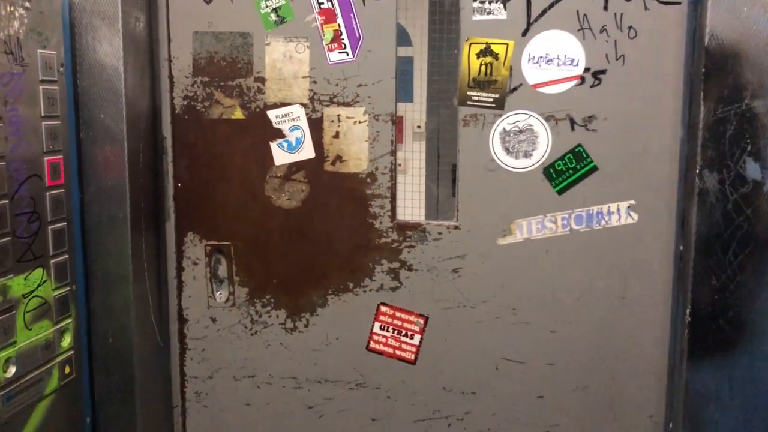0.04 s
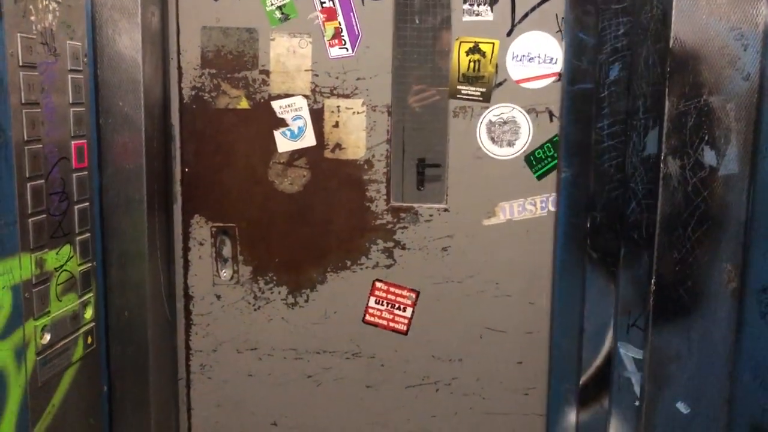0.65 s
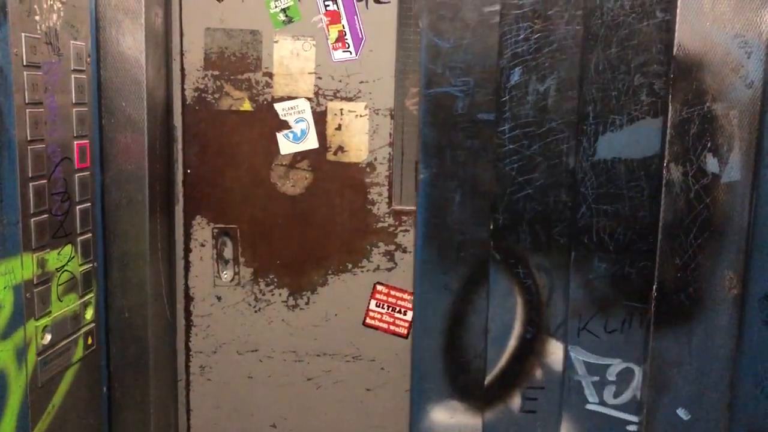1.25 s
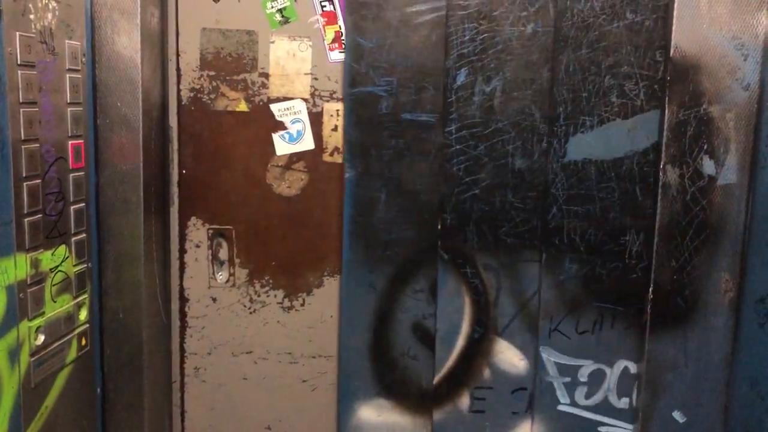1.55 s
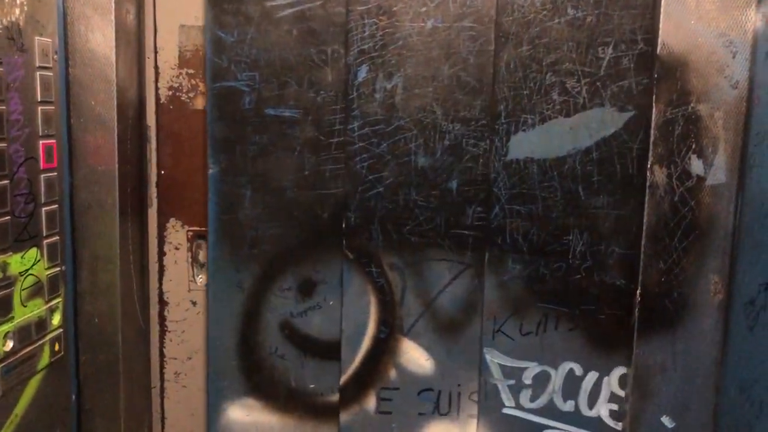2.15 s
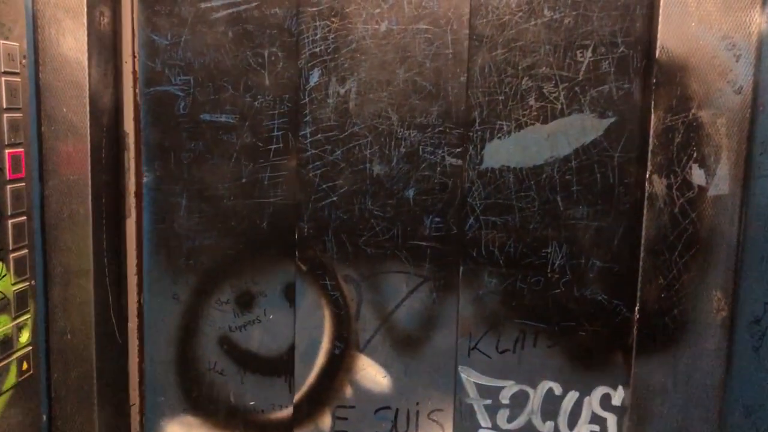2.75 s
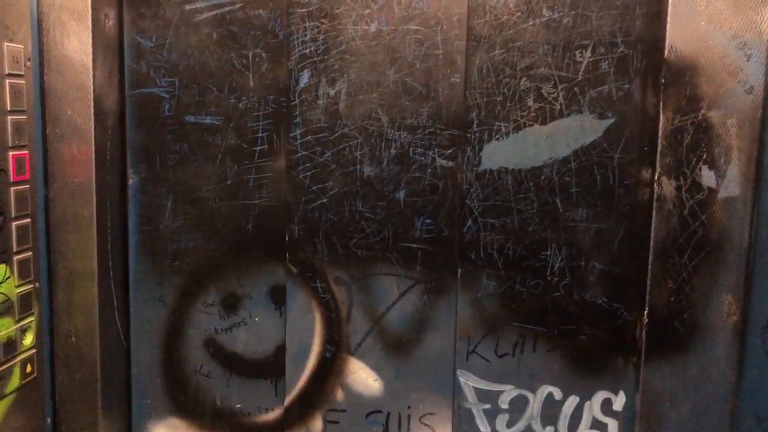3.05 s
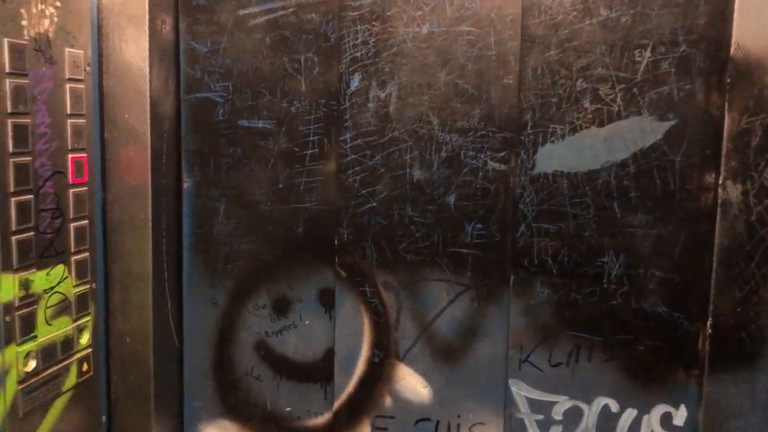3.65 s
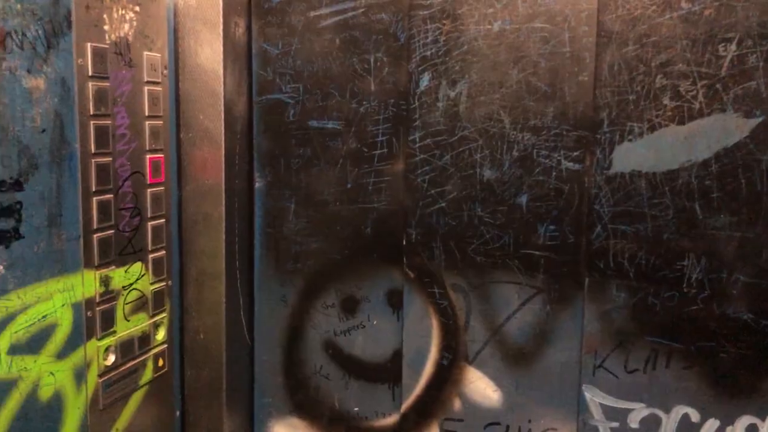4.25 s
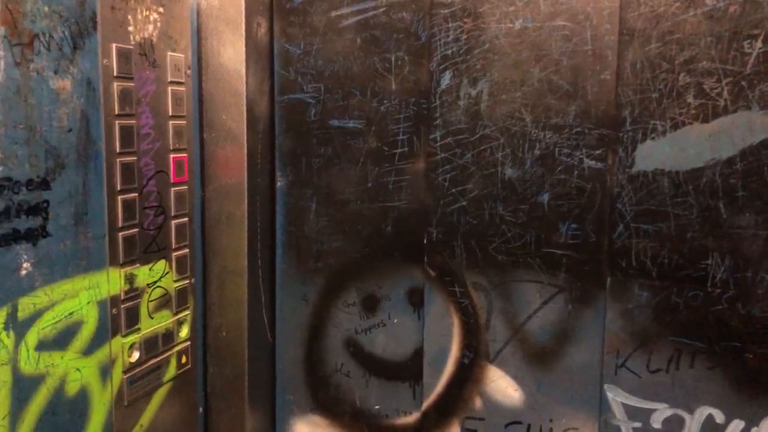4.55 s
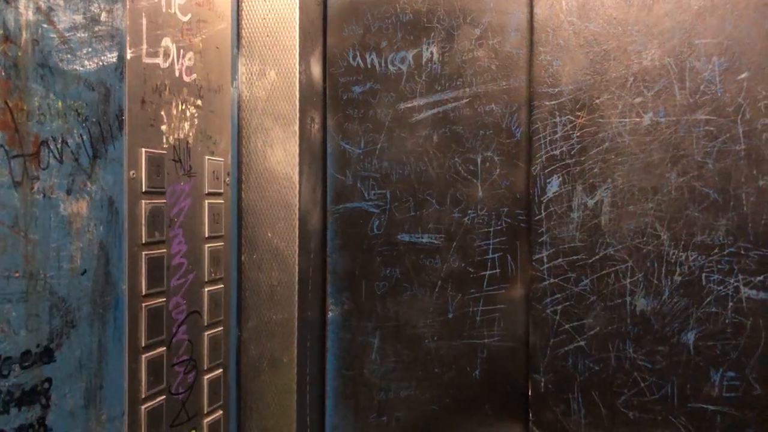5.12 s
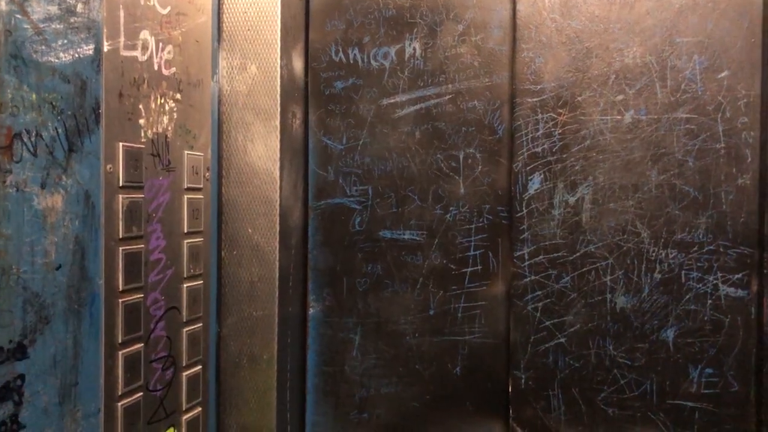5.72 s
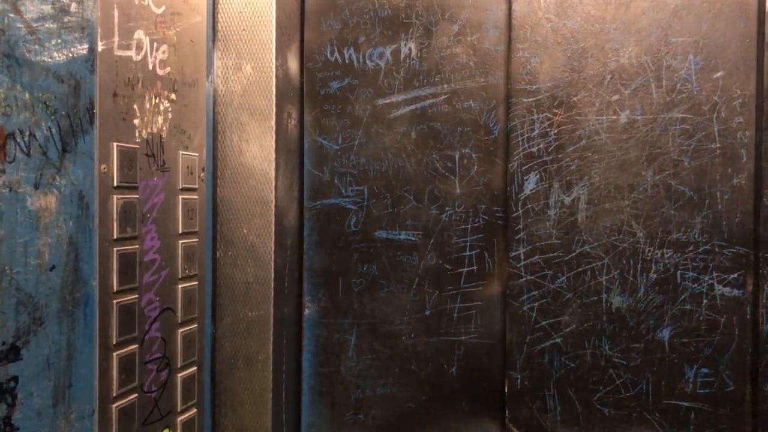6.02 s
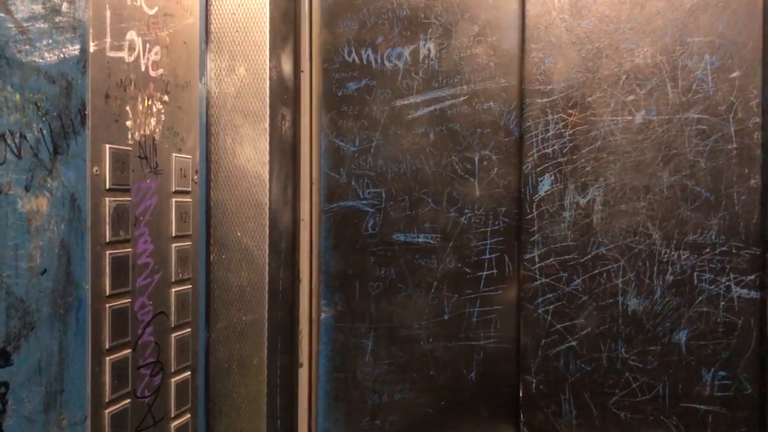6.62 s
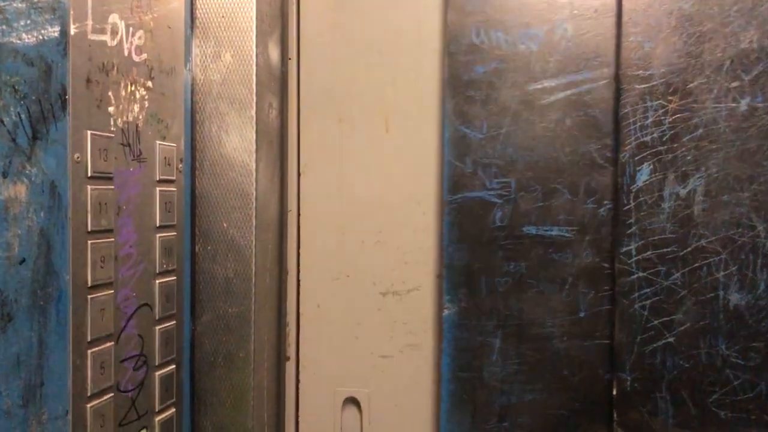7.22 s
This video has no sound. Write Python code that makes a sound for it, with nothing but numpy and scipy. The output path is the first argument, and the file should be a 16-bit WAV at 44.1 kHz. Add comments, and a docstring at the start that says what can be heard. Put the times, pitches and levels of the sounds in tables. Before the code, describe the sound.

An old lift door bangs, the folding door rattles shut, the car rumbles briefly, then the lock clunks and the door reopens.

```python
"""Inside an old steel lift. The landing door bangs and its panels ring. The folding car door rolls shut,
scraping, rattling and squealing, then latches and bumps home. The car moves off with a fading rumble
and a faint motor whine, and the level dips for an instant. After a quiet hum the lock releases with
a double clunk, and the door rolls open again."""
import sys
import numpy as np
from scipy import signal
from scipy.fft import rfft, irfft, next_fast_len
from scipy.io import wavfile
from scipy.ndimage import uniform_filter1d

SR = 44100
rng = np.random.default_rng(int(sys.argv[2]) if len(sys.argv) > 2 else 0)


def to_wav(sig):
    """Store sig (one row per channel, or 1-D mono) as 16-bit WAV at the path in sys.argv[1].

    Samples outside -1..1 are clipped; the rate is SR.
    """
    pcm = np.clip(np.atleast_2d(sig), -1, 1) * 32767
    pcm = np.round(pcm).astype(np.int16)
    wavfile.write(sys.argv[1], SR, pcm.T)  # frames by channels


N = 329594
TIME = np.arange(N) / SR

# A "mode" is a pitch at which a part likes to ring. Its ring time (t60) is how long it takes to fall 60 dB.
# A "spectrum" says how strong a noise is from low to high pitch.

# spectrum of the air in the shaft: (pitch [Hz], level [dB])
SHAFT_AIR = [(30, -10), (200, -11), (430, -9), (600, -16), (1000, -19.5), (1800, -25), (4000, -28),
             (7000, -25), (10000, -28), (15000, -28.5)]
# motor tones: (start [s], end [s], pitch [Hz], level [dB], width [Hz])
MOTOR_TONES = [(3.85, 4.62, 1001, -81.5, 11), (3.83, 4.52, 1916, -87.5, 6), (3.87, 4.5, 1997, -90, 5),
               (3.87, 4.5, 2078, -91, 5), (4.08, 4.45, 167, -62, 1.5), (4.45, 4.86, 167, -71, 2),
               (3.8, 4.86, 402, -78, 6), (3.8, 3.95, 575, -73, 6), (4.42, 4.54, 575, -74, 6),
               (4.3, 4.92, 1320, -80.5, 90), (4.5, 5.85, 1001, -91, 8), (4.88, 5.85, 200, -79, 3),
               (4.95, 5.7, 301, -85, 3)]

# modes of the car swaying on its ropes, of its floor and its walls: (pitch [Hz], width [Hz], level [dB])
SWAY_MODES = [(32.85, 5.6, 5), (56.8, 6, -1.5)]
FLOOR_MODES = [(80, 14, 2.5), (92.8, 15.1, 0), (116.2, 15, -5.5)]
WALL_MODES = [(175.4, 28, -1), (204.3, 11, 0.5), (218.6, 6.6, 6), (243.1, 3.7, 4), (256.2, 17, -2.5),
              (328.7, 11, -3), (362, 17, -12.5)]
# how hard each of the three shakes: (level at full door speed [dB], change with door speed [dB per dB],
# boost with the door unfolded [dB], level in a steady ride [dB], level at rest [dB])
SWAY_DRIVE = (-46, 0.84, 6.5, -69, -82)
FLOOR_DRIVE = (-40, 1.05, 2, -65, -72.5)
WALL_DRIVE = (-47.5, 0.8, 10, -66, -82.5)
# jolts that shake the car: (time [s], sway [dB], floor [dB], walls [dB])
JOLTS = [(0.1, -54, -34.5, -37), (0.72, -37.5, -36.5, -50.5), (0.82, -54, -35.5, -46.5),
         (1.02, -41, -33, -44.5), (1.41, -39.5, -48, -42.5), (1.56, -36.5, -36, -65),
         (1.93, -55, -58, -42.5), (2.12, -39.5, -62, -38.5), (2.38, -43, -42, -65), (2.55, -44, -46, -71),
         (3.12, -57, -48, -46), (3.29, -48, -53, -46), (4.64, -69, -58, -74), (5.702, -82.5, -59.5, -59.5),
         (5.94, -53, -46, -42), (6.08, -43, -39.5, -38), (6.42, -64, -49.5, -43.5), (6.82, -63, -49, -46.5),
         (6.92, -40, -60, -40.5), (7.32, -50, -63, -39)]

# speed of the car door, given as a loudness: (time [s], level [dB])
CLOSING_SPEED = [(0.45, -54), (0.49, -54), (1.15, -47), (1.29, -47.5), (1.93, -46.5), (1.96, -45),
                 (2.72, -63), (3.3, -65.5)]
OPENING_SPEED = [(6.42, -58.5), (6.454, -62), (6.732, -63.5), (7.154, -52.5), (7.45, -47)]
# how far the door is unfolded: (time [s], share [0-1])
UNFOLDED = [(0.2, 0), (2.6, 1), (6.5, 1), (7.47, .75)]
# when the door's folding panels, the "leaves", slide in the floor groove, the "sill": (start [s], length [s])
SILL_CONTACT = [(0.33, 4.2), (6.81, 1)]
# dry rollers and hinges squealing: (start [s], length [s], pitch [Hz], level [dB])
SQUEALS = [(0.904, 0.098, 2100, -58), (1.023, 0.096, 893, -44.5), (1.173, 0.17, 900, -52.5),
           (1.205, 0.33, 686, -51.5), (1.438, 0.078, 1383, -52), (3.142, 0.08, 1030, -61),
           (3.211, 0.081, 1020, -51.5)]
# a leaf scuffs the sill and its hinge clacks: (start [s], length [s], hiss [dB], clack [dB])
SCUFFS = [(0.11, 0.082, -51.5, -61.5), (0.201, 0.1, -46.5, -54), (0.682, 0.06, -55.5, -48),
          (0.794, 0.11, -51, -57), (1.001, 0.084, -54.5, -52.5), (1.095, 0.05, -54.5, -79),
          (1.338, 0.014, -53, -65), (1.57, 0.036, -56, -67), (2.132, 0.011, -53, -48),
          (2.185, 0.025, -53.5, -61), (2.242, 0.016, -60, -72), (2.39, 0.051, -64, -68),
          (3.285, 0.056, -61, -60), (6.98, .035, -66, -66), (7.243, 0.017, -53, -59)]
# spectra of that hiss and that clack: (pitch [Hz], level [dB])
SCUFF_SPECTRUM = [(1500, -13), (4000, -1.5), (7000, -1.5), (9000, -3.5), (12500, 2.5), (16000, -11)]
CLACK_SPECTRUM = [(300, -10), (900, 7), (1800, -4.5), (4000, 0), (7000, -13), (15000, -34)]
# modes of the steel leaves: (pitch [Hz], level [dB])
LEAF_MODES = [(883, 0), (1375, -2), (1412, 0), (1535, -2), (1610, -3), (1685, -2), (1830, -1), (2008, -3),
              (2150, -1), (2444, -7), (2756, -2), (2815, -3), (2923, -4), (3170, -4), (3445, -6),
              (3895, -5), (4120, -8), (4400, -5), (4680, -5), (4975, -9), (5180, -9), (5740, -9),
              (6600, -10)]
# rollers, hinges and panels knocking:
# (time [s], level [dB], pitch [Hz], width [octaves], share of clear ring [0-1], rise [s])
KNOCKS = [(0.520, -45.5, 630, 0.27, 0.08, 0.0016), (0.694, -44.5, 1390, 0.37, 0.46, .008),
          (0.886, -44, 1880, 0.3, 0.2, 0.0038), (0.888, -47.5, 3900, 0.46, 0.3, 0.0024),
          (0.988, -48, 1720, .12, 0.2, 0.0024), (1.035, -44.5, 1300, 1, 0.5, .004),
          (1.349, -46.5, 3680, 0.36, 0.23, 0.0025), (1.566, -56, 1700, 0.91, 0.1, .003),
          (1.702, -43, 1560, 0.43, 0.7, 0.0039), (1.70, -54, 4600, 0.09, 0.2, .002),
          (1.847, -45, 1620, 0.49, 0.3, 0.0044), (1.85, -54, 6050, 0.2, 0.2, .002),
          (1.915, -42.5, 2820, 0.044, 0.4, 0.0018), (1.933, -41, 1690, 0.56, 0.75, 0.002),
          (1.934, -52.5, 4330, .14, 0.45, 0.0012), (1.952, -39, 410, 0.42, 0, .004),
          (2.003, -46.5, 800, 0.48, 0, .003), (2.066, -46, 400, 0.19, 0, 0.0032),
          (2.13, -52, 500, .6, 0.4, 0.005), (2.176, -49, 1200, 0.45, 0.7, .003),
          (2.215, -45, 400, 0.33, 0.1, .004), (2.445, -57, 830, 0.3, 0.3, 0.0056),
          (2.505, -54.5, 1490, 1, 0.3, 0.0034), (2.749, -57, 4500, 0.34, 0.2, .002),
          (2.756, -54.5, 1670, 0.6, 0.35, 0.011), (2.754, -43, 836, 0.24, 0.25, 0.015),
          (3.125, -56, 890, 0.16, 0.2, 0.014), (3.189, -51.5, 4760, 0.83, 0.4, 0.0016),
          (3.194, -48.5, 960, 0.031, 0.01, 0.0046), (3.212, -53.5, 2300, 0.39, 0, .004),
          (3.229, -56, 1860, 0.049, 0.7, .003), (3.256, -60, 1370, 0.13, 0.7, .003),
          (3.27, -49, 550, 0.3, 0.18, .004), (4.43, -72, 605, 0.75, 0.2, .002),
          (4.679, -65, 450, .7, 0.01, .002), (5.921, -41.5, 2440, 0.045, 0.2, .001),
          (6.029, -37, 1585, .06, 0.77, 0.00085), (6.26, -46.5, 645, 0.47, 0, 0.024),
          (6.44, -52.5, 620, 0.33, 0.2, 0.018), (6.75, -66, 800, 0.23, 0.06, .002),
          (7.246, -56.5, 4200, .18, 0.2, .002), (7.362, -43, 2950, 0.16, 0.1, .001),
          (7.344, -48, 1210, 0.66, 0.3, 0.008)]
# modes of the roller track: (pitch [Hz], width [Hz], level [dB])
TRACK_MODES = [(308, 14, 6), (355, 25, 7), (398, 18, 10), (560, 40, -2), (680, 18, 4), (788, 20, 0),
               (915, 28, -1), (1040, 40, -5), (1356, 45, -1), (1540, 45, -6), (1850, 90, -7)]
# spectra of the rolling wheels and the sliding leaves: (pitch [Hz], level [dB])
ROLLING_SPECTRUM = [(100, -15.5), (400, 6), (600, -1.5), (1000, -6), (2000, -15), (4000, -18), (7000, -32),
                    (15000, -41)]
SLIDING_SPECTRUM = [(800, -4.5), (3000, 6), (5500, 1.5), (8000, -4), (11500, 1), (14000, -1.5), (16000, -1)]

# the latch scrapes in its slot: (start [s], level [dB], length [s], rasp [dB], brightness [dB])
LATCH_STROKES = [(-0.01, -40, 0.057, 5.5, -2.5), (3.114, -55, 0.029, -5, -3), (3.147, -58, .034, -16, -8),
                 (5.885, -56, 0.0088, -12, -3), (5.896, -41, .022, -10, 3.5), (5.915, -44, 0.052, 0, 0),
                 (5.986, -49.5, 0.047, 7, -2.5)]
# modes of the latch: (pitch [Hz], width [Hz], level [dB])
LATCH_MODES = [(2130, 120, -17), (2850, 160, -12), (3390, 70, -2), (3560, 80, 1), (3900, 90, -4),
               (4260, 160, -6), (5090, 120, -14), (5980, 160, -6), (6370, 200, -8), (7080, 220, -6),
               (7330, 140, 0), (7640, 220, -6), (8250, 300, -11), (10500, 200, -7)]
# spectrum of its rasp: (pitch [Hz], level [dB])
RASP_SPECTRUM = [(100, -0.5), (600, -1), (1500, -8), (4000, -7), (5500, -11.5), (8000, -8.5),
                 (15000, -15.5)]
# the catch snaps free; a hinge drops on its stop: (time [s], level [dB], brightness [dB per octave])
CATCH_SNAPS = [(5.895, -46, -4), (5.922, -46, 8), (6.034, -42, 5)]
HINGE_CLACKS = [(7.362, -54.5, 4), (7.370, -49, -4), (7.380, -44.5, -5)]
# modes of the steel catch and of the hinge with its leaf: (pitch [Hz], level [dB], ring time [s])
CATCH_MODES = [(3553, 0, .06), (3880, -9, .16), (7295, -1, .15), (7410, -5, .16), (10500, -14, .11)]
HINGE_MODES = [(1362, -2, .26), (1440, -6, .2), (1523, 1, .2), (1700, -1, .26), (1790, -5, .2),
               (1960, -6, .3), (2654, -7, .3), (2790, -6, .22), (2934, -1, .23), (3214, -5, .25)]

# heavy blows on the car and on the landing door, with their strength from low to high pitch:
# (time [s], thud [dB], boom [dB], clang [dB], crack [dB], swell [s])
CAR_BLOWS = [(3.198, -35, -50.5, -46.5, -56, 0.015), (3.236, -28, -44, -54, -66, 0.02),
             (5.921, -52, -46, -42, -35, 0.00064), (6.031, -36.5, -35, -34.5, -36.5, 0.0014)]
LANDING_SLAM = [(0.061, -21.5, -26.5, -25, -28.5, 0.006)]
# modes of the car's panels and of the landing door: (pitch [Hz], level [dB], ring time [s])
CAR_MODES = [(86, -4, .5), (300, -5, .4), (375, -7, .5), (441, -1, .45), (554, -6, .45), (1090, -12, .35),
             (1535, -10, .25), (3170, -17, .2), (3750, -18, .4), (5400, -15, .2), (5815, -17, .2),
             (7300, -9, .16)]
LANDING_MODES = [(74, 3, .45), (173, -3, 1.0), (307, -7, .8), (423, -5, .6), (447, -6, .55), (505, -5, .55),
                 (530, -2, .45), (576, -5, .6), (625, -5, .6), (785, -10, .42), (1240, -11, .42),
                 (1360, -8, .38), (1588, -14, .35), (1745, -16, .45), (3120, -11, .2), (3445, -10, .28),
                 (3520, -11, .25), (3747, -12, .52), (4086, -19, .5), (5905, -15, .22), (7391, -15, .16)]
# deep ring of the walls after a blow: (pitch [Hz], level [dB], ring time [s], build-up [s])
BOOM_MODES = [(172, -4, 1.0, .07), (221, 6, .9, .065), (247, -4, .4, .006)]
# spectrum of clattering panels: (pitch [Hz], level [dB])
CLATTER_SPECTRUM = [(30, -5), (80, -1), (135, -9), (220, -6), (330, -4), (550, -1), (800, -8), (1450, -8),
                    (2200, -18), (3600, -13), (5000, -18), (7400, -16), (10000, -21), (15500, -30)]
# how long the car rings: (pitch [Hz], ring time [s])
RING_TIME = [(40, 0.35), (200, 1), (500, 0.66), (1500, 0.53), (4000, 0.51), (8000, 0.32), (15000, 0.37)]


def from_db(db):
    """Turn decibels into a gain to multiply by."""
    return 10 ** (np.asarray(db) / 20)


def rms_one(x):
    """Scale a sound to an average power of one."""
    return x / np.sqrt(np.mean(x ** 2) + 1e-20)


def at_hz(points, hz):
    """Read a table at any pitch, giving each octave equal room."""
    pitches, values = np.transpose(points)
    return np.interp(np.log(np.maximum(hz, 1)), np.log(pitches), values)


def add(out, s, sound):
    """Mix a sound in, starting at s seconds."""
    i = max(int(s * SR), 0)
    out[i:i + len(sound)] += sound[:N - i]


def between(start, end, fade):
    """A gain that fades in after start and is gone by end."""
    return np.clip((TIME - start) / fade, 0, 1) * np.clip((end - TIME) / fade, 0, 1)


def dying(t, t60):
    """A gain that falls 60 dB in t60 seconds."""
    return np.exp(-np.log(1000) * t / t60)


def burst(start, hold, attack, t60):
    """A gain that rises, holds and dies away."""
    return np.clip((TIME - start) / attack, 0, 1) * dying(np.clip(TIME - start - hold, 0, 2 * t60), t60)


def sines(hz, t):
    """One pure tone per pitch, each starting at a random point in its wave."""
    return np.sin(2 * np.pi * (hz[:, None] * t + rng.random((len(hz), 1))))


def grit(spread_db, size=N):
    """Noise like a dense stream of tiny contacts of uneven size."""
    noise = rng.standard_normal(size)
    unevenness = np.repeat(rng.standard_normal(size // 128 + 1), 128)[:size]
    return rms_one(noise * from_db(spread_db * unevenness))


def coloured(x, spectrum):
    """Shape a sound with a spectrum, then scale it to a power of one."""
    size = next_fast_len(len(x), real=True)
    gains = from_db(at_hz(spectrum, np.fft.rfftfreq(size, 1 / SR)))
    return rms_one(irfft(rfft(x, size) * gains, size)[:len(x)])


def resonate(x, modes):
    """Let a sound ring a set of modes; every second one is added upside down."""
    out = 0
    for k, (hz, width, db) in enumerate(modes):
        r = np.exp(-np.pi * width / SR)
        ring = signal.lfilter([1, 0, -1], [1, -2 * r * np.cos(2 * np.pi * hz / SR), r * r], x + 1e-18)
        out = out + (-1) ** k * from_db(db) * (1 - r * r) / 2 * ring
    return out


def steadied(x, window_s):
    """Even out the swelling of a ring that is driven without pause."""
    local_power = uniform_filter1d(x * x, int(window_s * SR) + 1)
    return rms_one(x / np.sqrt(local_power + np.mean(x * x) / 20))


def tone(length, hz, width, fade_s=0.043):
    """A tone that swells, wanders a little in pitch and fades."""
    t = TIME[:int(max(length, .02) * SR)]
    ring = resonate(rng.standard_normal(len(t) + SR // 4), [(hz, width, 0)])[-len(t):]
    return steadied(ring, window_s=0.035) * np.clip(np.minimum(t, t[-1] - t) / fade_s, 0, 1)


def wall_echoes(x, echo_db, t60):
    """Add the dense echoes that bounce between close steel walls."""
    t = TIME[:SR // 2]
    echoes = rng.standard_normal(len(t)) * dying(t, t60)
    return x + from_db(echo_db) * signal.fftconvolve(x, echoes / np.linalg.norm(echoes))[:N]


def machinery(hum_hz=77.0, hum_db=-68, guide_db=-75, air_db=-71.3):
    """A low hum and the shaft's air never stop; the motor whines and the guides rub during the ride."""
    out = from_db(hum_db) * np.sqrt(2) * np.sin(2 * np.pi * hum_hz * TIME)
    for start, end, hz, db, width in MOTOR_TONES:
        add(out, start, from_db(db) * tone(end - start, hz, width))
    running = between(3.5, 4.95, fade=.15)
    guides = coloured(rng.standard_normal(N),
                      [(200, -7), (520, -3.5), (800, -14.5), (1500, -19), (3000, -20), (8000, -38)])
    air = coloured(rng.standard_normal(N), SHAFT_AIR)
    return out + from_db(guide_db) * running * guides + from_db(air_db) * air


def shake_gains(speed_db, start_s=3.21, stop_s=4.885, surge_db=27, settle_s=0.58):
    """How strong sway, floor and walls are: the powers of door, ride, jolts and resting rumble add up."""
    unfolded = np.interp(TIME, *np.transpose(UNFOLDED))
    surge = from_db(surge_db * np.exp(-np.maximum(TIME - start_s, 0) / settle_s))
    ride = between(start_s, stop_s, fade=0.023) * surge
    times, *strengths = np.transpose(JOLTS)
    jolts = np.array([burst(s, hold=0.043, attack=0.029, t60=1) ** 2 for s in times])
    gains = []
    for drive, jolt_db in zip((SWAY_DRIVE, FLOOR_DRIVE, WALL_DRIVE), strengths):
        door_db, follows, unfolded_db, ride_db, rest_db = drive
        door = from_db(door_db + follows * speed_db + unfolded_db * unfolded)
        jolt_power = from_db(jolt_db) ** 2 @ jolts
        power = door ** 2 + (from_db(ride_db) * ride) ** 2 + jolt_power + from_db(rest_db) ** 2
        gains.append(np.sqrt(power))
    return gains


def car_rumble(speed_db):
    """The door and the ride sway the car and shake its floor and thin walls."""
    sway_gain, floor_gain, wall_gain = shake_gains(speed_db)
    sway = resonate(rng.standard_normal(N), SWAY_MODES)
    sway = coloured(sway, [(12, -14.5), (28, -6.5), (65, 12), (130, -21)])
    floor = resonate(rng.standard_normal(N), FLOOR_MODES)
    floor = coloured(floor, [(35, -10), (70, -5), (125, -0.5), (300, -28)])
    walls = resonate(grit(spread_db=-0.5), WALL_MODES)
    walls = coloured(walls, [(90, -26), (160, 1), (420, -3.5), (800, -9), (3000, -27.5)])
    return (sway_gain * steadied(sway, window_s=0.4) + floor_gain * steadied(floor, window_s=0.12)
            + wall_gain * steadied(walls, window_s=0.16))


def door_speed(full_speed_db=-45.5, speed_up_db_per_s=2, rest_from_s=3.44, rest_until_s=6.3):
    """Door speed in dB, where 0 is full speed; the door gathers pace for each run and rests between."""
    runs = []
    for run in (CLOSING_SPEED, OPENING_SPEED):
        times, db = np.transpose(run)
        time_to_go = np.maximum(times[0] - TIME, 0)
        runs.append(np.interp(TIME, times, db) - speed_up_db_per_s * time_to_go)
    resting = np.clip((TIME - rest_from_s) / 1.9, 0, 1) * np.clip((rest_until_s - TIME) / .3, 0, 1)
    return np.maximum(*runs) - full_speed_db - 60 * resting


def sill_pressure():
    """How firmly the leaves press on the sill."""
    return sum(burst(s, length, attack=0.16, t60=1.5) for s, length in SILL_CONTACT)


def sill_ticks(speed_db, per_s=120, level_db=-62, follows_speed=0.56, t60=.05):
    """Each rough spot that the leaves scrape over rings its own dozen high steel modes."""
    out, t = np.zeros(N), TIME[:int(t60 * SR)]
    for s in rng.uniform(0, N / SR, int(per_s * N / SR)):
        hz = rng.uniform(3500, 14500, 12)
        tick = sines(hz, t).sum(axis=0) * dying(t, t60)
        add(out, s, from_db(rng.uniform(-4, 4)) * tick)
    gain = from_db(level_db + follows_speed * speed_db) * sill_pressure()
    return gain * rms_one(wall_echoes(out, echo_db=-5, t60=.2))


def squeals():
    """A dry roller or hinge sticks and slips, singing for a moment."""
    out = np.zeros(N)
    for s, length, hz, db in SQUEALS:
        add(out, s, from_db(db) * tone(length, hz, width=1.4))
    return out


def leaf_rattle(speed_db, per_s=22, level_db=-55, follows_speed=1.9, spread_db=4, width_hz=16):
    """The loose leaves tap each other at random as the door runs; each tap favours other modes."""
    starts = rng.integers(0, N, int(per_s * N / SR))
    out, t = np.zeros(N), TIME[:SR // 3]
    hz, db = np.transpose(LEAF_MODES)
    rings = sines(hz, t) * np.exp(-np.pi * width_hz * t) * np.minimum(t / .003, 1)
    strengths = from_db(db + spread_db * rng.standard_normal((len(starts), len(hz))))
    for i, tap in zip(starts, strengths @ rings):
        add(out, i / SR, tap)
    taps = coloured(out, [(900, 2), (1800, 1), (2600, -7.5), (6000, -3)])
    return from_db(level_db + follows_speed * speed_db) * taps


def scuffs(attack_s=0.011):
    """A leaf swings against the sill: its hinge clacks and its edge hisses while it drags."""
    drag = sum(from_db(db) * burst(s, length, attack_s, t60=0.22) for s, length, db, _ in SCUFFS)
    clack = sum(from_db(db) * burst(s, attack_s, attack_s, t60=0.93) for s, _, _, db in SCUFFS)
    edge = coloured(grit(spread_db=2), SCUFF_SPECTRUM)
    hinge = coloured(grit(spread_db=2), CLACK_SPECTRUM)
    return drag * edge + clack * hinge


def knocks(t60=.36, fringe_db=-24):
    """Small hits shake the leaves around one pitch: part noisy clatter, part clear steel ring."""
    out, t = np.zeros(N), TIME[:SR // 2]
    hz = np.fft.rfftfreq(len(t), 1 / SR) + 1
    mode_hz, mode_db = np.transpose(LEAF_MODES)
    tones = sines(mode_hz, t)
    for s, db, pitch, width, clear, rise in KNOCKS:
        peak = np.exp(-.5 * (np.log2(hz / pitch) / width) ** 2)
        spectrum = peak + from_db(fringe_db) / (1 + hz / pitch)
        clatter = rms_one(irfft(rfft(rng.standard_normal(len(t))) * spectrum, len(t)))
        strengths = from_db(mode_db + 2 * rng.standard_normal(len(mode_hz)))
        ring = rms_one((np.interp(mode_hz, hz, spectrum) * strengths) @ tones)
        knock = np.sqrt(1 - clear) * clatter + np.sqrt(clear) * ring
        add(out, s, from_db(db) * knock * dying(t, t60) * (1 - np.exp(-t / rise)))
    return out


def chatter(depth_db, per_s):
    """A gain that wavers as surfaces catch and let go."""
    steps = rng.standard_normal(int(per_s * N / SR) + 2)
    return from_db(depth_db * np.interp(TIME * per_s, np.arange(len(steps)), steps))


def door_rolling(speed_db, roll_db=-45.5, track_db=-42.5, slide_db=-54, slide_follows=0.73):
    """Rollers grind along the track while the leaves slide in the sill, both louder with speed."""
    grind = rms_one(wall_echoes(grit(spread_db=2.5), echo_db=-3.5, t60=0.18))
    track = resonate(grit(spread_db=2), TRACK_MODES)
    track = coloured(track, [(100, -20.5), (280, 5), (2000, -7.5), (6000, -8)])
    roll = from_db(roll_db) * coloured(grind, ROLLING_SPECTRUM) + from_db(track_db) * track
    hiss = from_db(slide_db + slide_follows * speed_db) * coloured(grit(spread_db=-1), SLIDING_SPECTRUM)
    return from_db(speed_db) * roll + sill_pressure() * chatter(depth_db=1.9, per_s=40) * hiss


def latch():
    """Steel dragged over steel rasps and makes the latch sing."""
    out, t = np.zeros(N), TIME[:SR // 4]
    for s, db, length, rasp_db, bright_db in LATCH_STROKES:
        age = t - min(s, 0)   # a stroke that starts before time zero is already under way
        stroke = np.clip(age / .005, 0, 1) * np.clip((length + .008 - age) / .006, 0, 1)
        friction = coloured(grit(spread_db=3, size=len(t)), [(3000, -bright_db), (8000, bright_db)])
        ring = resonate(friction * stroke, LATCH_MODES) / np.std(resonate(friction, LATCH_MODES))
        rasp = from_db(rasp_db) * stroke * coloured(friction, RASP_SPECTRUM)
        add(out, s, from_db(db) * (ring + rasp))
    return wall_echoes(out, echo_db=-4, t60=.25)


def struck_steel(hits, modes):
    """A small steel part is hit and rings in its own few modes."""
    out, t = np.zeros(N), TIME[:SR // 2]
    hz, mode_db, t60 = np.transpose(modes)
    octaves = np.log2(hz) - np.mean(np.log2(hz))
    for s, db, bright_db in hits:
        rings = sines(hz, t) * dying(t, t60[:, None])
        strengths = from_db(db + mode_db + bright_db * octaves)
        add(out, s, strengths @ rings * np.minimum(t / .002, 1))
    return wall_echoes(out, echo_db=-9, t60=.25)


def wall_boom(gain_db=9):
    """After a blow the car's walls take up the energy slowly and hum on in a few deep modes."""
    out, t = np.zeros(N), TIME[:SR]
    for s, _, boom_db, _, _, swell in CAR_BLOWS:
        for hz, db, t60, build in BOOM_MODES:
            shape = (1 - np.exp(-t / (swell + build))) * dying(t, t60)
            wave = np.sin(2 * np.pi * (hz * t + rng.random()))
            add(out, s, from_db(gain_db + boom_db + db) * shape * wave)
    return out


def heavy_blows(hits, modes, modes_db, clatter_db, snap_db, snap_t60, build_cycles):
    """Each blow makes steel panels clatter and ring; low pitches build up more slowly."""
    out = np.zeros(N)
    edges = 28 * 2 ** (np.arange(29) / 3)   # three bands per octave, from 28 Hz up
    centres = np.sqrt(edges[1:] * edges[:-1])
    shares = from_db(at_hz(CLATTER_SPECTRUM, centres)) * np.sqrt(np.diff(edges))
    shares = 2 * shares / np.linalg.norm(shares)
    filters = [signal.butter(2, band, "band", fs=SR, output="sos") for band in zip(edges, edges[1:])]
    for s, thud_db, boom_db, clang_db, crack_db, swell in hits:
        force = [(100, thud_db), (170, boom_db), (260, boom_db),
                 (480, clang_db), (1500, clang_db), (4000, crack_db)]
        white = rng.standard_normal((3, 2 * SR))   # neighbouring bands get unrelated noise
        # the clatter: in each band, a quick snap on top of a longer tail
        for k, (band, hz, share) in enumerate(zip(filters, centres, shares)):
            t60 = at_hz(RING_TIME, hz)
            t = TIME[:int(min(t60, 1) * SR)]
            rise = 1 - np.exp(-t / (swell + build_cycles / hz))
            fall = dying(t, t60) + from_db(snap_db) * dying(t, snap_t60)
            clatter = rms_one(signal.sosfilt(band, white[k % 3, :len(t) + SR // 4])[SR // 4:])
            add(out, s, from_db(clatter_db + at_hz(force, hz)) * share * rise * fall * clatter)
        # the ring: one clear tone per mode
        for hz, db, t60 in modes:
            t = TIME[:int(t60 * SR)]
            shape = (1 - np.exp(-t / (swell + build_cycles / hz))) * dying(t, t60)
            gain = from_db(modes_db + db + at_hz(force, hz) + rng.standard_normal())
            add(out, s, gain * shape * np.sin(2 * np.pi * (hz * t + rng.random())))
    return out


def scene():
    """Mix everything into one channel, as heard from inside the car."""
    slam = heavy_blows(LANDING_SLAM, LANDING_MODES, modes_db=0.5, clatter_db=-4.5,
                       snap_db=2.5, snap_t60=0.21, build_cycles=1.9)
    clunks = heavy_blows(CAR_BLOWS, CAR_MODES, modes_db=4.5, clatter_db=-1,
                         snap_db=-12, snap_t60=0.12, build_cycles=1.4)
    speed_db = door_speed()
    door = (door_rolling(speed_db) + leaf_rattle(speed_db) + scuffs() + knocks() + squeals()
            + sill_ticks(speed_db))
    small_parts = latch() + struck_steel(CATCH_SNAPS, CATCH_MODES) + struck_steel(HINGE_CLACKS, HINGE_MODES)
    return (slam + clunks + wall_boom() + door + small_parts + car_rumble(speed_db) + machinery())[None]


def record(dry):
    """The level dips for an instant mid-ride; the deepest bass and the highest treble are cut."""
    dip = 1 - .94 * between(4.853, 4.879, fade=.003)
    bass_cut = signal.butter(4, 18, "high", fs=SR, output="sos")
    treble_cut = signal.ellip(12, .1, 80, 15550, fs=SR, output="sos")
    return signal.sosfilt(treble_cut, signal.sosfilt(bass_cut, dry) * dip)


dry = scene()
out = record(dry)
to_wav(out)
```